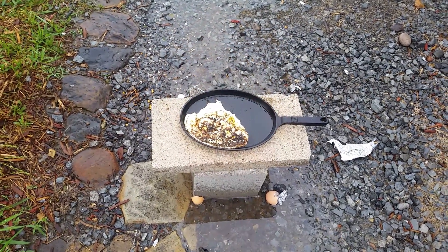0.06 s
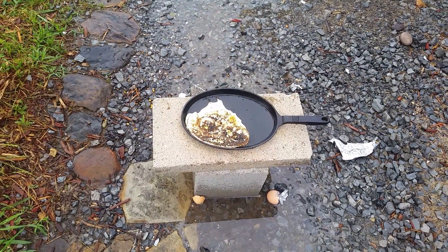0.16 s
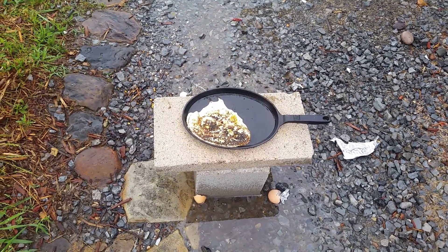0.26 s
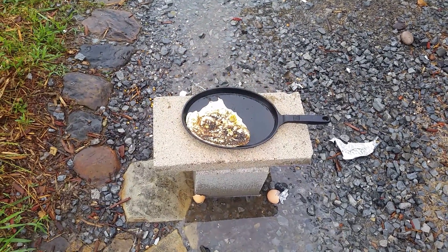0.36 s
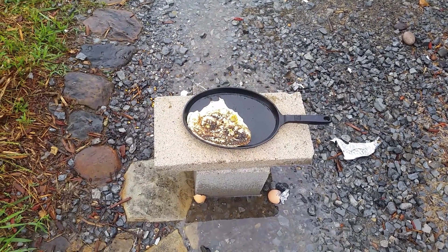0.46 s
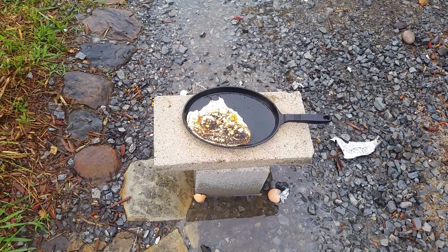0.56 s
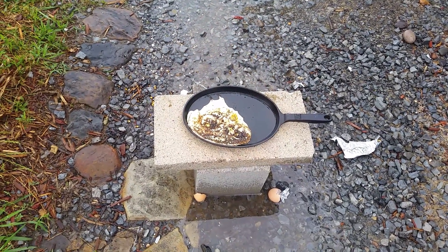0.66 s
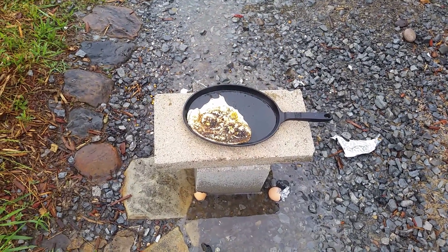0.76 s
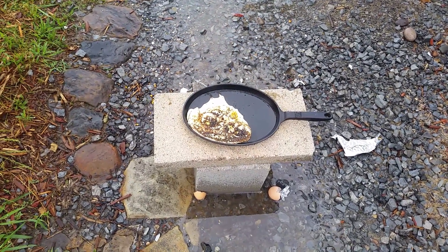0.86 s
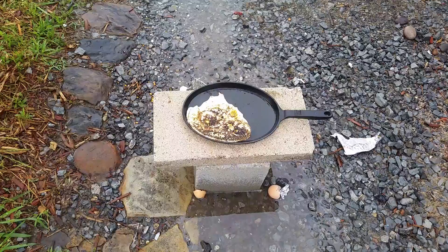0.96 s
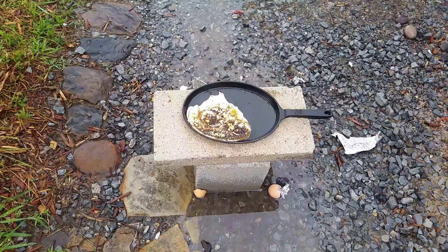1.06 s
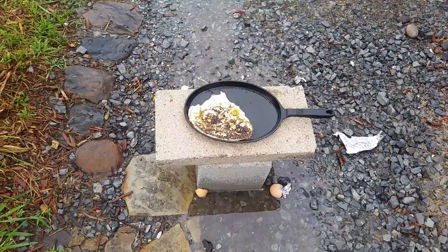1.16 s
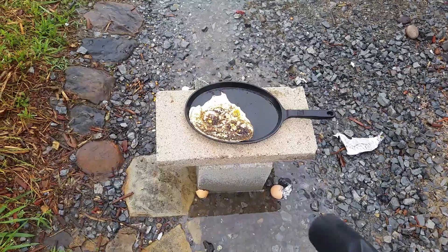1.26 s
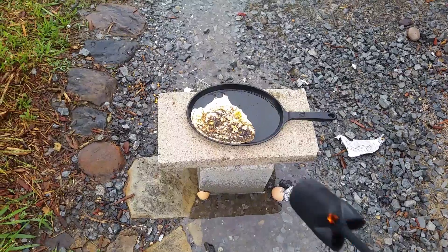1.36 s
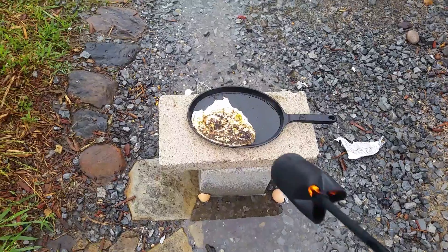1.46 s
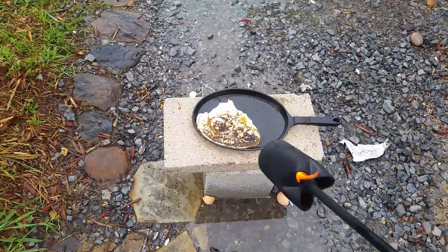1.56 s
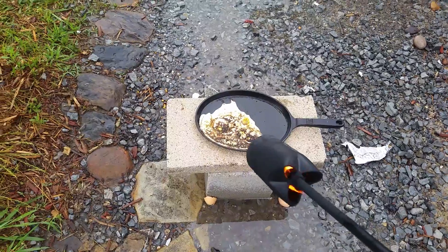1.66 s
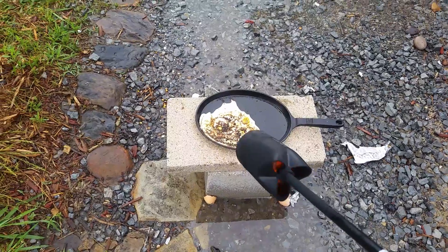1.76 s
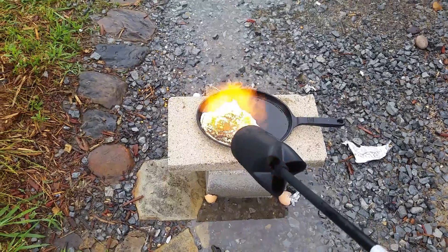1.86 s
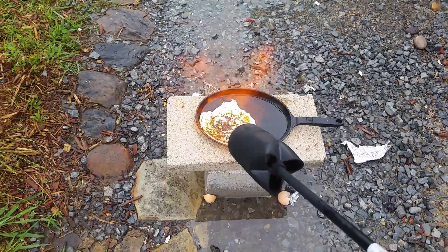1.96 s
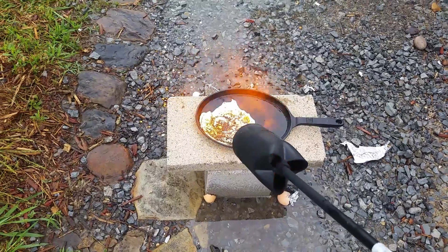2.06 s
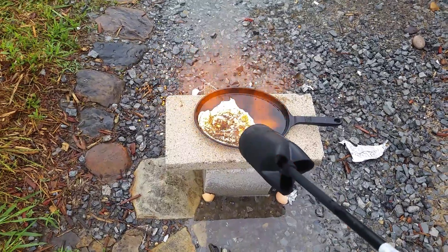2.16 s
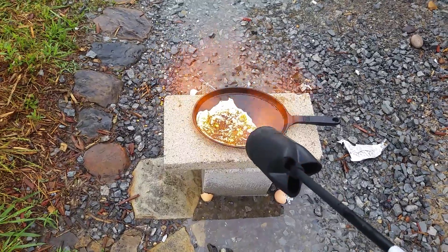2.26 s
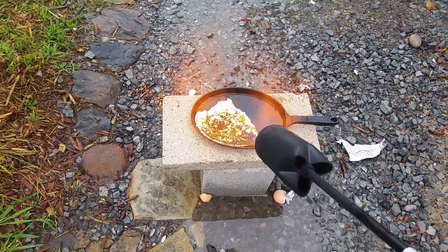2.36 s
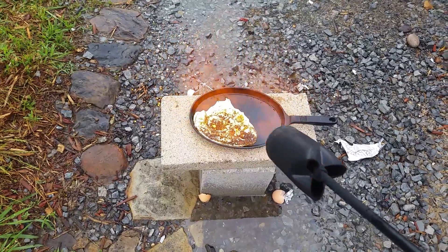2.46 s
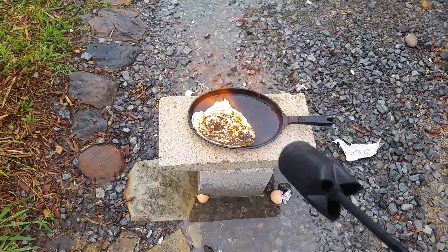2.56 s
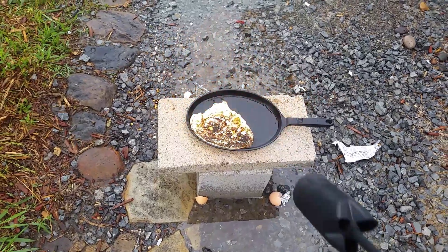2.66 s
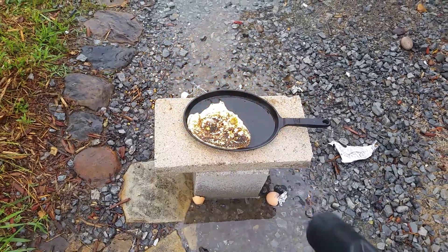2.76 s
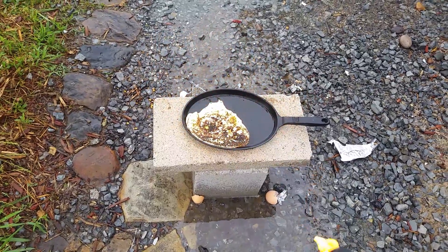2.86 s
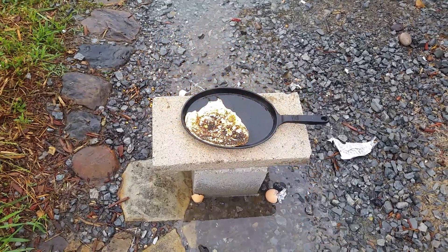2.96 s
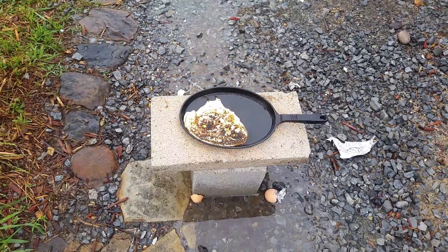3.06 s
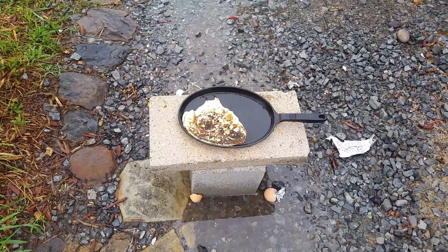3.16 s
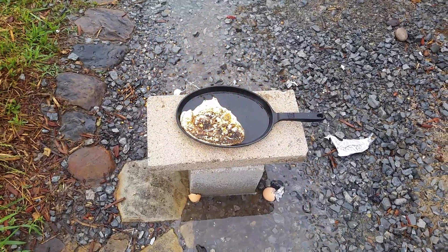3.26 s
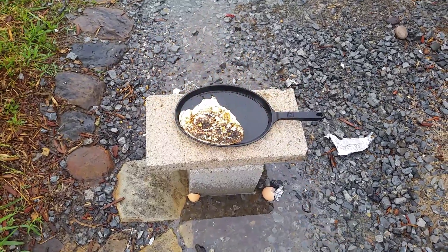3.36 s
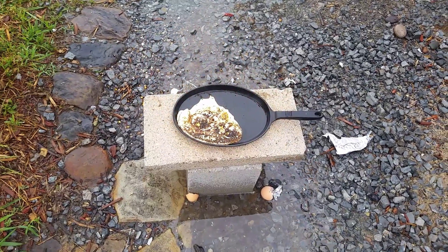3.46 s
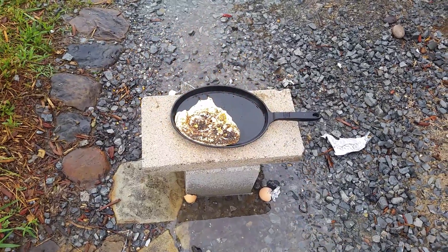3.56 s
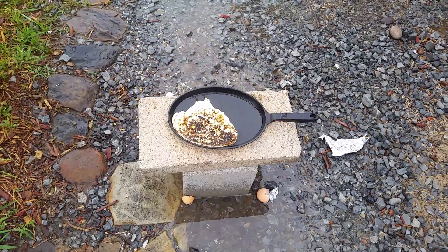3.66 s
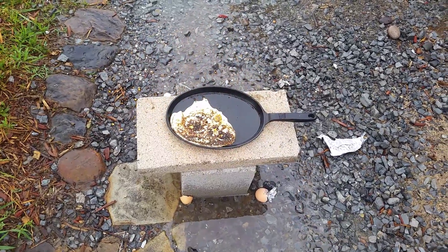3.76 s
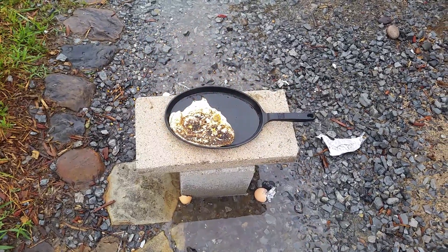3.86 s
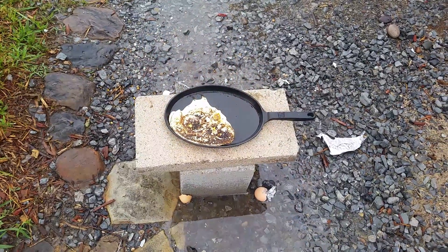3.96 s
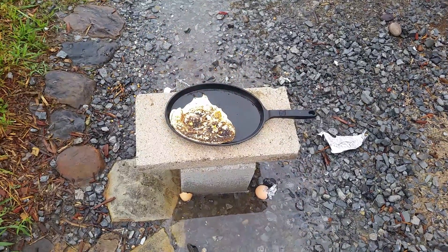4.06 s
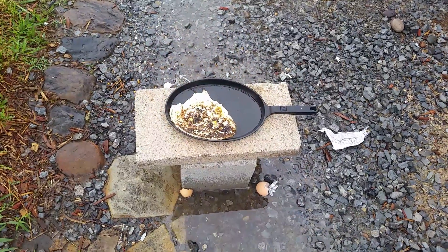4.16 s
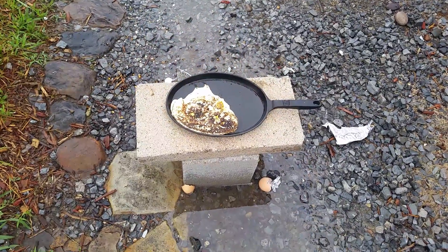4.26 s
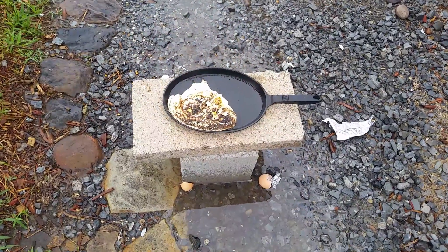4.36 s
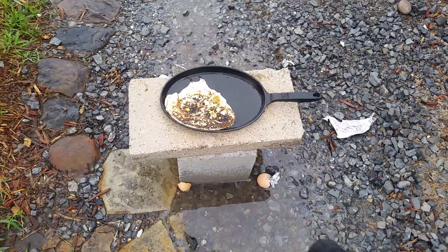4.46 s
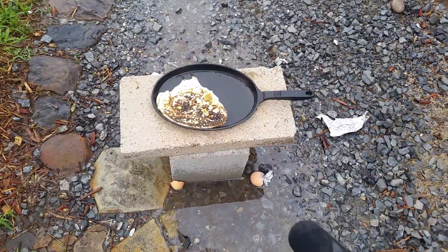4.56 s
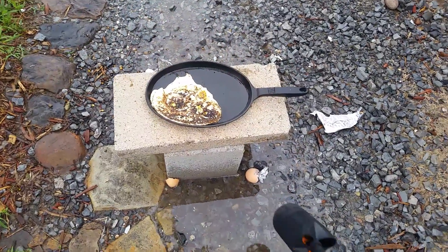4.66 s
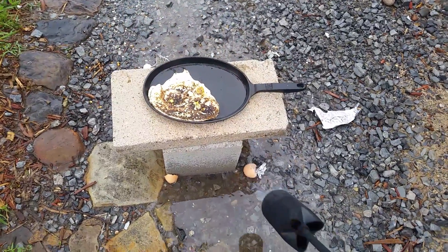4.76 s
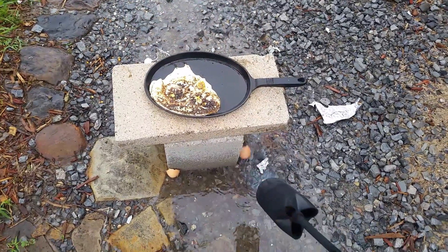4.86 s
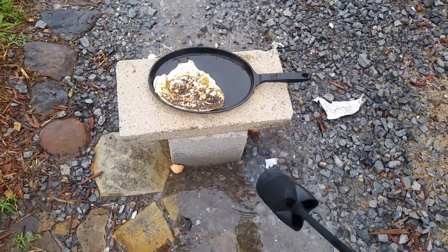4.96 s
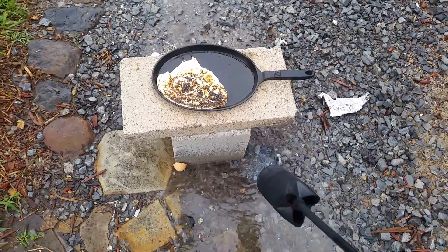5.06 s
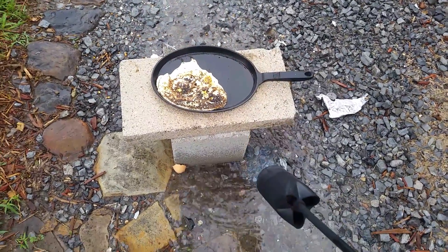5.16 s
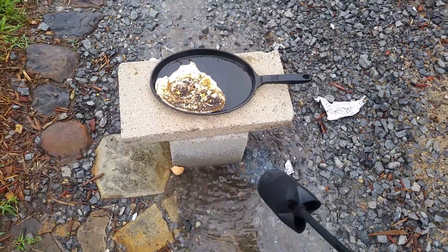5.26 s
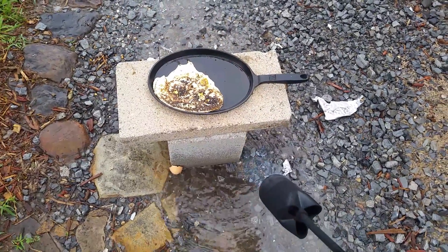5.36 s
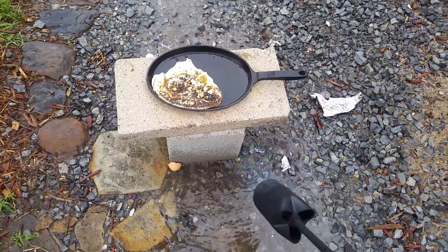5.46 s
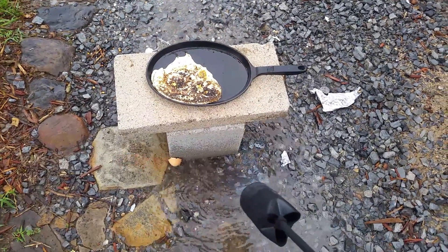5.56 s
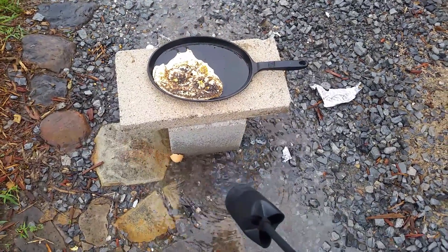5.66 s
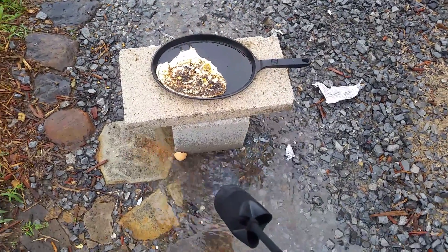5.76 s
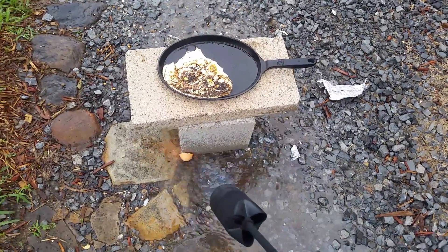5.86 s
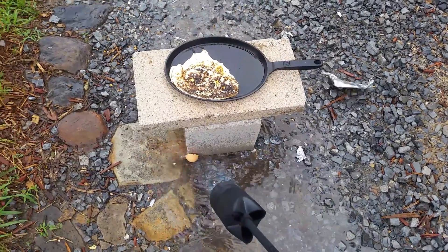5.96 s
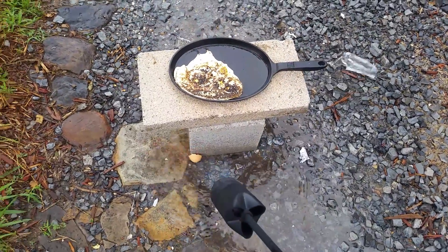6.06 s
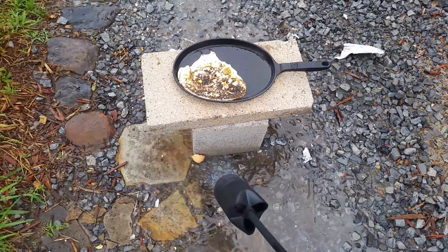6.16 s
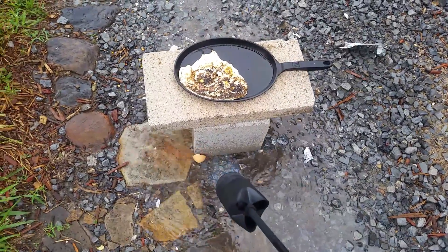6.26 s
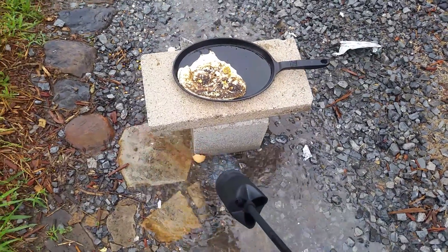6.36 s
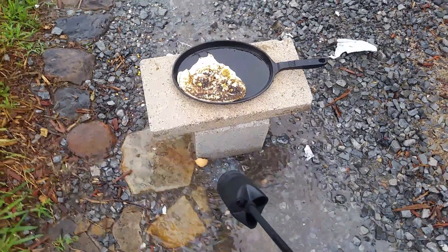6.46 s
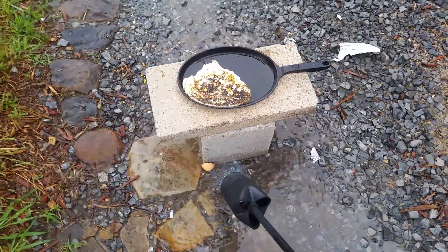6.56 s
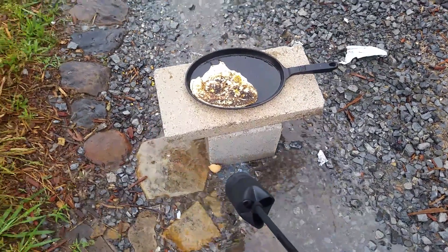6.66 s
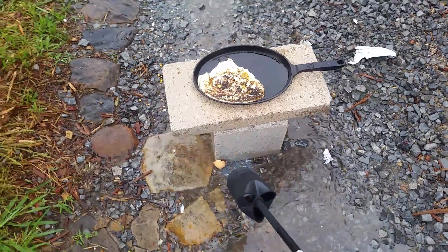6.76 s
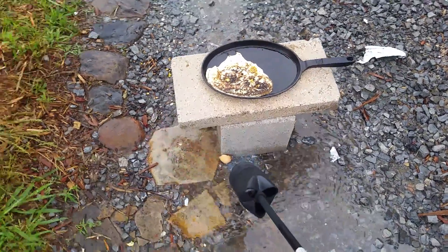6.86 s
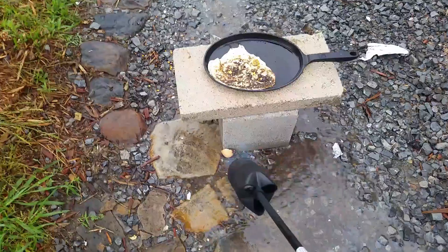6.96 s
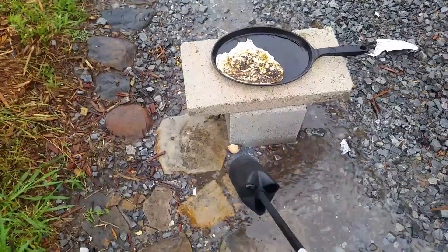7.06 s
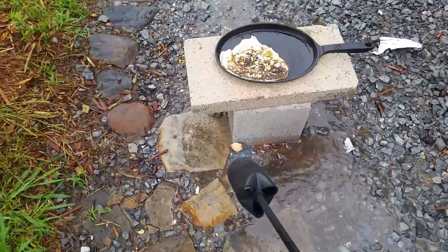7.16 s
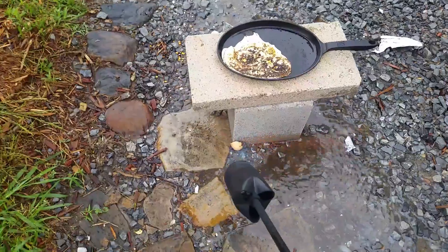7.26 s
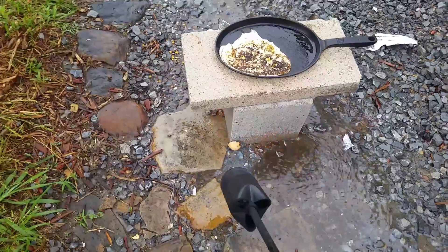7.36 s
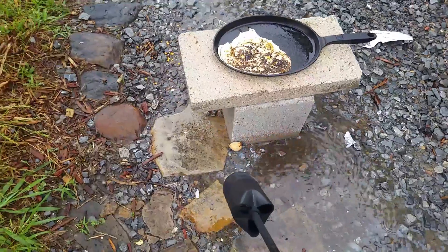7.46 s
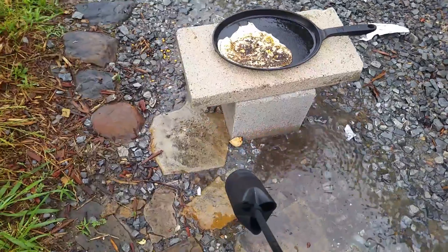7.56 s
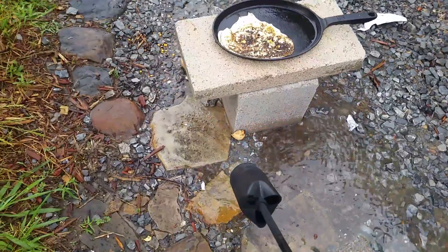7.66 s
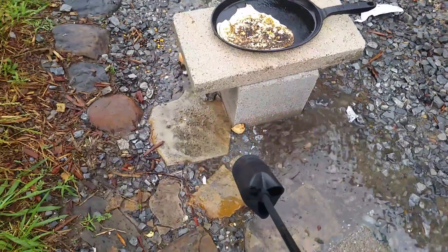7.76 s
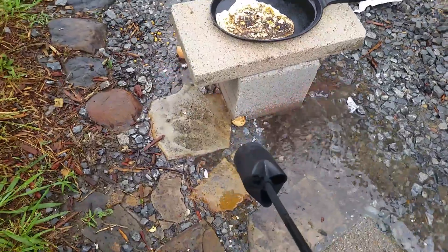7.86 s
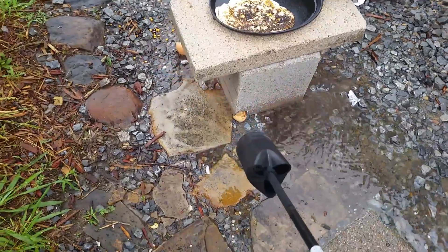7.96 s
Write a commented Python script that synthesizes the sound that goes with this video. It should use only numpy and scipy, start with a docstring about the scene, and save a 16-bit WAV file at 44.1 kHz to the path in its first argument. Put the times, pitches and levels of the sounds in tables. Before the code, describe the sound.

Close outdoor stereo sound of a long-wand propane torch. A tiny pilot flame hums and hisses on the left with small ticks, knocks and a sharp click. A short roar bursts out and dies quickly. Faint crackle and gritty ticks return, wind-like buffets bump the left side, then the flame catches with a strong thump and roars steadily to the end.

```python
"""A small pilot flame hums in a burner bell, its gas hissing on the left, while bits of grit tick.
A long-wand propane torch then gives one short blast and later a long one over wet gravel: filtered noise
hisses as gas, then roars as flame, coloured by the ground. Shaped noise also makes the ticks, a faint
crackle, the sizzle of a scorched pan, buffets of air and the handling of the wand. Gain control ducks
under loud sound and recovers slowly."""
import sys
import numpy as np
from scipy import signal
from scipy.fft import rfft, irfft, next_fast_len
from scipy.io import wavfile
from scipy.ndimage import uniform_filter1d, minimum_filter1d

SR = 44100
rng = np.random.default_rng(int(sys.argv[2]) if len(sys.argv) > 2 else 0)


def wrap_up_sound(samples):
    """Save the sound to the file named by the first command line argument, as 16-bit audio."""
    columns = np.atleast_2d(samples).T
    # keep every value between -1 and 1, then stretch to whole-number steps
    tamed = np.clip(columns, -1, 1)
    steps = np.round(tamed * 32767).astype(np.int16)
    wavfile.write(sys.argv[1], SR, steps)


N = 353241  # samples, about 8 s
TIME = np.arange(N) / SR
SIZE = next_fast_len(N, True)
HZ = np.maximum(np.arange(SIZE // 2 + 1) * SR / SIZE, 1)  # frequencies of the spectrum, kept above zero


# Colour of the burning rumble, the rush through the bell and the nozzle's jet: (frequency [Hz], level [dB])
RUMBLE_COLOUR = [(20, -35), (42, -17), (65, -6.5), (100, 0), (180, 2), (280, -1.5), (420, -10.5),
                 (620, -17), (850, -29), (1500, -43)]
RUSH_COLOUR = [(350, -25), (600, 0), (800, 1.5), (1300, -2), (1900, -11.5), (2900, -10.5), (3400, -19),
               (4600, -18.5), (5700, -26.5), (7500, -25), (11000, -30.5)]
JET_COLOUR = [(3000, -32), (4300, -20), (7000, -16), (8600, -11.5), (9600, -8.5), (10400, -2),
              (11500, -2.5), (13200, 0), (16000, 0.5)]
# Colour of the bell's lowest mode when it flares up: (frequency [Hz], level [dB])
FLARE_COLOUR = [(400, -60), (950, -20), (1090, -1.5), (1170, 1), (1330, -23), (3000, -47)]
# When that mode flares up: (time [s], level [dB], length [s])
FLARE_TIMES = [(4.92, -38, .12), (6.79, -27, .028), (7.85, -32, 0.13)]
# Left-right balance of the torch: (frequency [Hz], left minus right [dB])
TORCH_BALANCE = [(200, -1), (700, 0), (1290, 4.5), (2380, 6), (4400, 11.5), (6000, 11.5), (8100, 3),
                 (10000, -2.5), (15000, 1.5)]
# The rush as the wand is swung: (time [s], level [dB], upper band relative to that level [dB])
RUSH_OVER_TIME = [(2.0, -26.5, -7.5), (2.598, -26.5, -11.5), (2.62, -30, -5.5), (4.84, -30.5, -8),
                  (4.9, -28.5, -12.5), (5.07, -28, -4.5), (5.76, -29, -10.5), (6.6, -29, -4),
                  (6.77, -28.5, -5), (7.51, -29.5, -7), (7.92, -27.5, -16), (7.97, -28.5, -11.5)]
# The hiss of the jet: (time [s], level [dB])
JET_OVER_TIME = [(1.96, -29.5), (2.594, -28.5), (2.62, -29.5), (4.82, -31.5), (5.39, -28.5), (5.65, -33),
                 (5.85, -26.5), (6.9, -27.5), (7.97, -26)]


def torch(rumble_db=-0.38, rush_db=1.45, jet_db=3.5, flicker_db=0.3, surge_db=0.55,
          sputter_db=1.0, jet_flicker_db=1.1, gust_db=0.46):
    """Burning eddies rumble, gas rushes through the bell and the nozzle hisses, all as unsteady noise."""
    rush_level_db, upper_db = in_time(RUSH_OVER_TIME)
    jet_level_db, = in_time(JET_OVER_TIME)
    balance_db = over_hz(TORCH_BALANCE)
    flicker = drift(rate=45)  # shared by rumble and rush
    gust = gust_db * drift(rate=30)  # shared by rush and jet

    rumble_level = rumble_db + flicker_db * flicker + surge_db * drift(rate=14)
    rumble = noise(RUMBLE_COLOUR, balance_db) * from_db(rumble_level)

    sputter = sputter_db * (.5 * flicker + drift(rate=240))
    rush = bell(noise(RUSH_COLOUR, balance_db), upper_db)
    rush = rush * from_db(rush_level_db + rush_db + sputter + gust)
    flares = swells(FLARE_TIMES) * noise(FLARE_COLOUR, balance_db)

    jet_flicker = jet_flicker_db * drift(rate=70)
    jet = noise(JET_COLOUR, balance_db) * from_db(jet_level_db + jet_db + jet_flicker + gust)

    flame, hiss = blasts(rumble, rush + flares, jet)
    return ground(flame) + hiss + ignition()


# The valve snaps open and closes slowly
VALVE_OPEN_S, VALVE_CLOSE_S = .026, 0.31
# The rush is weaker until the flame has filled the bell
UNLIT_RUSH_DB, FILL_S = -5, .085
# Each part of the sound follows a power of the gas supply as it dies away
RUMBLE_POWER, RUSH_POWER, JET_POWER = 2.45, 2.67, 3.8
# Each pull of the trigger: (valve opens [s], flame catches [s], flame rise [s], trigger let go [s],
# rumble level [dB], bass lift [dB], thump time [s], thump level [dB])
TRIGGER_PULLS = [(1.918, 1.922, 0.027, 2.638, -17.5, 3, 1.942, -12),
                 (4.776, 4.796, 0.019, 8.1, -16, -1, 4.8132, -2.5)]


def blasts(rumble, rush, jet, bass_hz=95, bass_width_hz=70):
    """Gas flows first, the flame catches a moment later, and all parts starve as the valve closes."""
    flame = hiss = 0
    for valve_s, catch_s, rise_s, release_s, db, bass_db, _, _ in TRIGGER_PULLS:
        gas = opening(valve_s, VALVE_OPEN_S)
        supply = np.abs(np.cos(np.pi / 2 * opening(release_s, VALVE_CLOSE_S)))
        body = signal.lfilter(*band_filter(bass_hz, bass_width_hz, bass_db), rumble)
        flame = flame + body * from_db(db) * opening(catch_s, rise_s) * supply ** RUMBLE_POWER
        unlit_db = UNLIT_RUSH_DB * (1 - opening(catch_s, FILL_S))
        flame = flame + rush * gas ** 2 * from_db(unlit_db) * supply ** RUSH_POWER
        hiss = hiss + jet * gas * supply ** JET_POWER
    return flame, hiss


def ignition(length_s=.0017, after_s=.005):
    """The gathered gas goes off in one thump: a soft push, a sharp opposite swing and a soft rebound."""
    swings, pushes = [], []
    for *_, s, db in TRIGGER_PULLS:
        swings.append((s, db, length_s))
        pushes.append((s - after_s, db, after_s))
        pushes.append((s + after_s, db, after_s))
    balance = length_s / after_s / 2  # the two pushes together cancel the swing's area
    return balance * swells(pushes) - swells(swings)


# Resonances of the burner bell: (frequency [Hz], width [Hz], lift before it is varied [dB])
BELL_MODES = [(1117, 81, 2.5), (2316, 760, 4.5), (4010, 530, 3.5)]


def bell(x, upper_db, upper_rest_db=-6.5, gleam_db=2.5, swirl_db=4.0, swirl_width=0.024):
    """The bell's modes swell, the middle one carrying the upper band; eddies light narrow wandering bands."""
    drives_db = (gleam_db * drift(rate=5), upper_db - upper_rest_db, gleam_db * drift(rate=2.715))
    for (hz, width_hz, lift_db), drive_db in zip(BELL_MODES, drives_db):
        wandering_hz = hz * from_db(.15 * drift(rate=3.3))
        x = moving_band(x, wandering_hz, lift_db + drive_db, width_hz / hz)
    for hz in np.geomspace(850, 4600, num=9):
        wandering_hz = hz * from_db(.6 * drift(rate=3))
        x = moving_band(x, wandering_hz, swirl_db * drift(rate=9), swirl_width)
    return x / x.mean(0).std()


# The ground echo comes later as the flame moves off the pan
ECHO_S, ECHO_SLIDE_S_PER_S = .0072, .00053
# The band the stones reinforce as the wand moves: (time [s], frequency [Hz], lift [dB], dip below it [dB])
GROUND_BAND = [(2.7, 431, 11, 8.5), (4.8, 330, 0.5, 0.5), (5.3, 305, 4.5, -1.5), (5.8, 350, -0.5, 0),
               (6.7, 420, 5.5, 0), (7.0, 456.7, -2, -2.5), (7.35, 590, 9, 5.5), (7.7, 538, 13, 3.5),
               (8.0, 532, 15.5, 7)]


def ground(x, echo_db=-12, dull=0.27, notch_db=4.0):
    """Stones near the flame lift one band and cut those beside it; a duller echo arrives ever later."""
    hz, lift_db, dip_db = in_time(GROUND_BAND)
    x = moving_band(x, hz, lift_db, width=0.61)
    x = moving_band(x, 0.62 * hz, -dip_db, width=0.51)
    x = moving_band(x, 1.41 * hz, -notch_db - 0.45 * lift_db, width=0.24)
    echo_time = TIME - ECHO_S - ECHO_SLIDE_S_PER_S * TIME
    echo = np.array([np.interp(echo_time, TIME, ear) for ear in x])
    pole = np.clip(dull, 0, .9)
    return x + from_db(echo_db) * signal.lfilter([1 - pole], [1, -pole], echo)


# Hum of the pilot flame: (frequency [Hz], typical wander [Hz], level before wavering [dB])
PILOT_NOTES = [(75, 1.73, -59.5), (120.6, 2.45, -64)]
# Colour of the draught and the throttled gas: (frequency [Hz], level [dB])
DRAUGHT_COLOUR = [(20, -11.5), (45, -7.5), (95, -4), (150, -11), (260, -20), (550, -21.5), (1300, -25),
                  (2200, -29), (7000, -41.5), (8500, -39), (11000, -30), (16000, -31)]
VALVE_COLOUR = [(2000, -40), (2450, -26.5), (2800, -9), (3200, -16), (3900, -3.5), (4900, -5),
                (5600, -13.5), (6400, -34), (8000, -37)]
# Left-right balance of the draught: (frequency [Hz], left minus right [dB])
DRAUGHT_BALANCE = [(100, 9.5), (300, 5), (1300, 11), (2300, 3), (6500, 8), (10500, -2.5), (15000, 0.5)]


def pilot(air_db=-63, hiss_db=-62.5, hiss_side_db=22, waver_db=1.1):
    """The small flame hums on two wavering notes over a soft draught; throttled gas hisses on the left."""
    hum = 0
    for hz, wander_hz, db in PILOT_NOTES:
        phase = 2 * np.pi * np.cumsum(hz + wander_hz * drift(rate=19)) / SR
        hum = hum + from_db(db + waver_db * drift(rate=12)) * np.sqrt(2) * np.sin(phase)
    draught = from_db(air_db) * noise(DRAUGHT_COLOUR, over_hz(DRAUGHT_BALANCE))
    hiss = from_db(hiss_db) * noise(VALVE_COLOUR, hiss_side_db)
    return hum + draught + hiss


# Ticks of grit and spitting fat, and the igniter's click at 1.30 s:
# (time [s], level before a shared trim [dB])
TICK_TIMES = [(0.3188, -35), (0.6888, -48), (1.1827, -45), (1.301, -23), (1.3384, -47), (1.5733, -34),
              (1.715, -47), (3.0341, -35), (3.1555, -30), (3.4422, -35), (3.73, -32), (3.7779, -40),
              (3.8193, -42), (3.954, -33.5), (4.0692, -40), (4.188, -44)]
# Colour of ticks, crackle and sizzle: (frequency [Hz], level [dB])
TICK_COLOUR = [(1000, -39), (3000, -26.5), (6000, -16), (8000, -14), (11000, -1.5), (14000, -2.5),
               (16000, -3)]


def grit(tick_db=-9, crack_s=0.00053, scatter_db=-19, scatter_s=.014, crackles_per_s=14,
         crackle_db=-64, sizzle_db=-64, cooling_db_per_s=14):
    """Tiny cracks with a faint scatter; faint crackle ticks at random; the hot pan sizzles as it cools."""
    age = TIME[:SR // 10]
    attack = 1 - np.exp(-2 * age / crack_s)
    crack = 2 * np.exp(-age / crack_s)
    scatter = from_db(scatter_db) * np.exp(-age / scatter_s)
    shape = attack * (crack + scatter)

    crackles = rng.random(N) < crackles_per_s / SR
    hits = crackles * from_db(crackle_db + 3 * rng.standard_normal(N))
    for s, db in TICK_TIMES:
        hits[int(s * SR)] += from_db(db + tick_db)

    cooling = TIME - TRIGGER_PULLS[0][3] - VALVE_CLOSE_S  # seconds since the first blast died
    fading_db = sizzle_db - cooling_db_per_s * np.abs(cooling)
    sizzle = (cooling > 0) * from_db(fading_db + 2 * drift(rate=67))
    return (signal.oaconvolve(hits, shape)[:N] + sizzle) * noise(TICK_COLOUR)


# Dull knocks of the wand and hose: (time [s], level [dB], length [s])
KNOCK_TIMES = [(0.398, -54.5, 0.014), (0.545, -60.5, 0.017), (4.385, -62, 0.013)]
# Scuffs, the igniter's click and a brief puff: (time [s], level [dB], length [s])
SCUFF_TIMES = [(0.53, -63, .013), (0.875, -57.5, 0.029), (1.278, -62.5, .008), (1.3021, -36, 0.0004),
               (4.755, -61, 0.012)]
# Colour of the knocks, and of the scuffs, click and puff: (frequency [Hz], level [dB])
KNOCK_COLOUR = [(100, -25), (190, 0), (240, 12), (310, -12), (440, 5), (650, -8), (850, -7), (2000, -21),
                (6000, -41)]
SCUFF_COLOUR = [(200, -35), (450, -17), (1200, -17), (1900, -8), (3000, -10), (7000, -16), (12000, -7),
                (16000, -8)]


def handling():
    """Dull knocks, scuffs, a click and a brief puff: short swells of low or bright noise."""
    knocks = swells(KNOCK_TIMES) * noise(KNOCK_COLOUR)
    scuffs_click_puff = swells(SCUFF_TIMES) * noise(SCUFF_COLOUR)
    return knocks + scuffs_click_puff


# When moving air buffets the left microphone: (time [s], level [dB], length [s])
BUFFET_TIMES = [(1.57, -53, 0.034), (4.18, -57, .02), (4.28, -51.5, 0.018), (4.39, -44, 0.018),
                (4.435, -43, 0.012), (4.485, -51, 0.019), (4.72, -59, 0.051), (4.778, -44, 0.0045)]
# Colour of the buffets: (frequency [Hz], level [dB])
BUFFET_COLOUR = [(20, -19), (50, 6.5), (90, 7.5), (160, -7), (400, -32), (2000, -68)]


def buffets(side_db=9):
    """Moving air pushes on the left microphone: short swells of low noise, louder on the left."""
    return swells(BUFFET_TIMES) * noise(BUFFET_COLOUR, side_db)


# Colour of the sound sent back by the yard: (frequency [Hz], level [dB])
YARD_COLOUR = [(100, -5.5), (350, -3.5), (1000, -5), (3000, -14), (10000, -28)]


def yard(x, wet_db=-42, t60_s=0.98):
    """Far walls and trees send back a faint, dull tail of fading noise."""
    tail = (noise(YARD_COLOUR) * from_db(-60 * TIME / t60_s))[:, :SR]
    tail = tail / np.sqrt(np.sum(tail[0] ** 2))
    return x + from_db(wet_db) * signal.oaconvolve(x, tail, axes=1)[:, :N]


# How alike the two ears are before mixing: (frequency [Hz], likeness [0 to 1])
EAR_LIKENESS = [(100, 1), (290, 0.98), (640, .94), (1100, 0.64), (1500, 0.48), (3000, 0.56), (4500, 0.42),
                (7000, .42), (15000, 0.52)]
# How far the left ear leads the right: (frequency [Hz], phase [radians])
LEFT_LEAD = [(400, 0.14), (1100, 0.76), (2400, 0.37), (3400, -1.24), (5000, -1.3), (8500, -1.5),
             (15000, -1.35)]


def noise(spectrum, side_db=0):
    """Stereo turbulence, alike in both ears in the bass and less so higher up; its middle has rms 1."""
    alike = np.clip(over_hz(EAR_LIKENESS), 0, .998)
    mid, side = rng.standard_normal((2, len(HZ))) + 1j * rng.standard_normal((2, len(HZ)))
    ears = np.array([[1], [-1]])
    pair = np.sqrt(1 + alike) * mid + ears * np.sqrt(1 - alike) * side
    pair = pair * from_db(ears * side_db / 2)
    pair[0] *= np.exp(1j * over_hz([(150, 0)] + LEFT_LEAD))
    x = irfft(pair * from_db(over_hz(spectrum)), SIZE)[:, :N]
    return x / x.mean(0).std()


def band_filter(hz, width_hz, lift_db):
    """Filter numbers that lift or dip one resonant band."""
    g, w = from_db(lift_db / 2), 2 * np.pi * hz / SR
    k = np.sin(w) * width_hz / hz / 2
    a = np.array([1 + k / g, -2 * np.cos(w), 1 - k / g])
    b = np.array([1 + k * g, -2 * np.cos(w), 1 - k * g])
    return b / a[0], a / a[0]


def moving_band(x, hz, lift_db, width, size=1024):
    """A lifted or dipped band that moves block by block; width is a share of its frequency."""
    out, state = np.zeros_like(x), np.zeros((2, 2))
    for i in range(0, N, size):
        b, a = band_filter(hz[i], width * hz[i], lift_db[i])
        out[:, i:i + size], state = signal.lfilter(b, a, x[:, i:i + size], zi=state)
    return out


def swells(rows):
    """A short rounded swell in loudness for each event."""
    total = 0
    for s, db, length_s in rows:
        distance = np.minimum(((TIME - s) / length_s) ** 2, 60)
        total = total + from_db(db) * np.exp(-distance)
    return total


def opening(start_s, rise_s):
    """A straight ramp from shut (0) to fully open (1)."""
    return np.clip((TIME - start_s) / rise_s, 0, 1)


def drift(rate):
    """Smooth random wander of rms 1, with so many random points per second."""
    knots = rng.standard_normal(int(N / SR * rate) + 2)
    return rms_one(np.interp(TIME * rate, np.arange(len(knots)), knots))


def in_time(rows):
    """Turn each column after the time into a curve with a value at every sample."""
    s, *columns = np.transpose(rows)
    return [np.interp(TIME, s, column) for column in columns]


def over_hz(points):
    """Read a table at every frequency, on a logarithmic pitch scale."""
    hz, value = np.transpose(points)
    return np.interp(np.log(HZ), np.log(hz), value)


def from_db(db):
    """Turn decibels into an amplitude factor."""
    return np.exp(np.asarray(db) * (np.log(10) / 20))


def rms_one(x):
    """Scale a signal to an rms of 1."""
    return x / np.sqrt(np.mean(x ** 2) + 1e-20)


def scene():
    """The torch and its yard echo, then the pilot flame, the grit, the handling and the buffets."""
    return yard(torch()) + pilot() + grit() + handling() + buffets()


def gain_control(x, target_db=-21, boost_db=12, hold_s=0.58, recover_db_per_s=16):
    """Quiet sound is lifted; loud sound takes the lift away at once, and it creeps back after a pause."""
    power = uniform_filter1d(np.mean(x ** 2, 0), size=441)  # averaged over 10 ms
    level_db = 10 * np.log10(np.maximum(power, 1e-12))
    duck_db = np.clip(level_db - target_db + boost_db, 0, boost_db)
    half = int(hold_s * SR / 2)
    held = -minimum_filter1d(-duck_db, 2 * half + 1, origin=half, mode="nearest")
    slope_db = recover_db_per_s * TIME
    released = np.maximum.accumulate(held + slope_db) - slope_db
    return x * from_db(boost_db - released)


CUTOFF_HZ = 15900


def record(dry):
    """Apply gain control, round the highest peaks, then cut the top of the treble steeply."""
    top = np.clip((CUTOFF_HZ - HZ) / 200 + .5, 0, 1)
    x = gain_control(dry)
    x = x / (1 + (x / .87) ** 8) ** (1 / 8)
    return irfft(rfft(x, SIZE) * top, SIZE)[:, :N]


dry = scene()
out = record(dry)
wrap_up_sound(out)
```